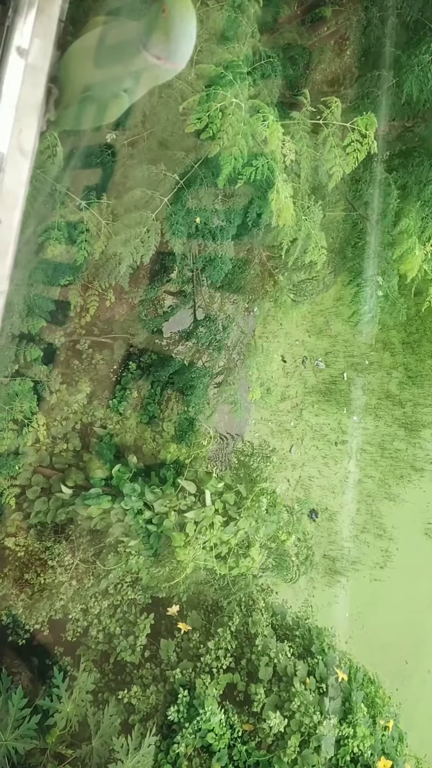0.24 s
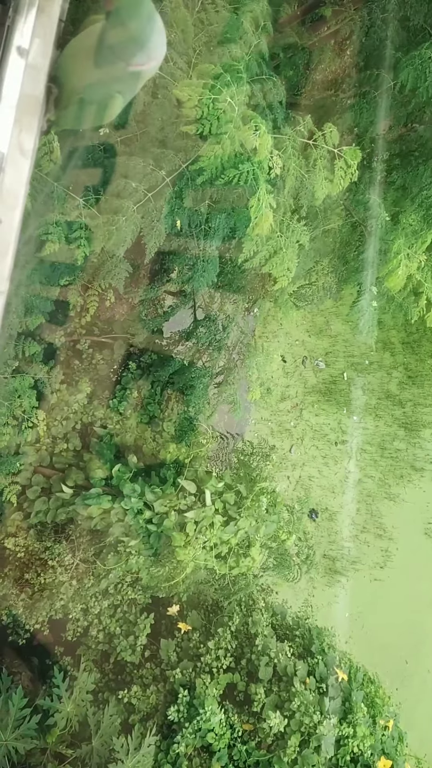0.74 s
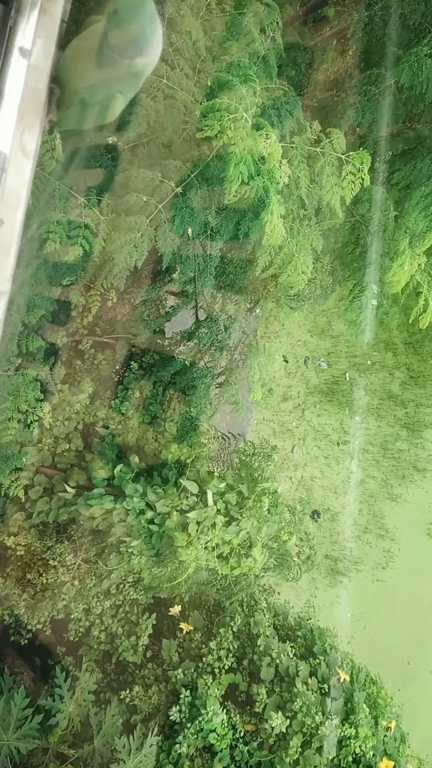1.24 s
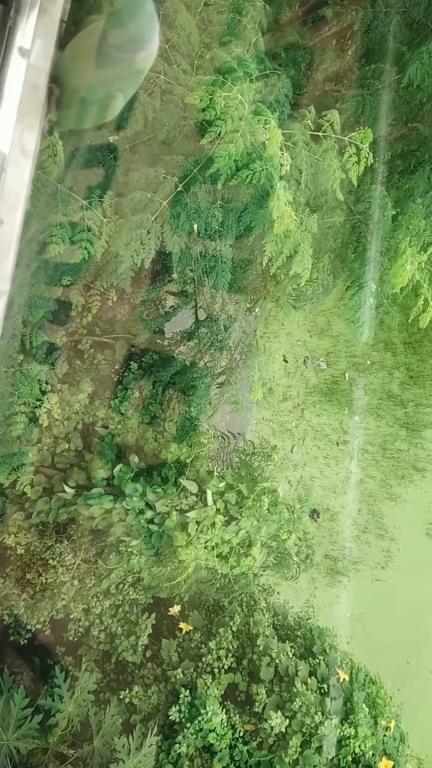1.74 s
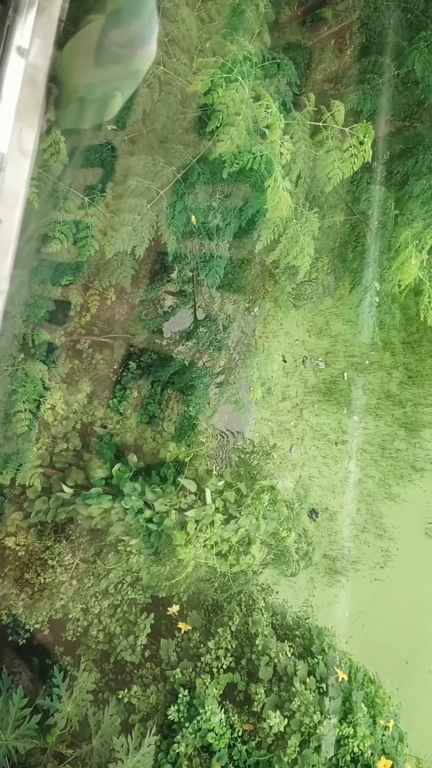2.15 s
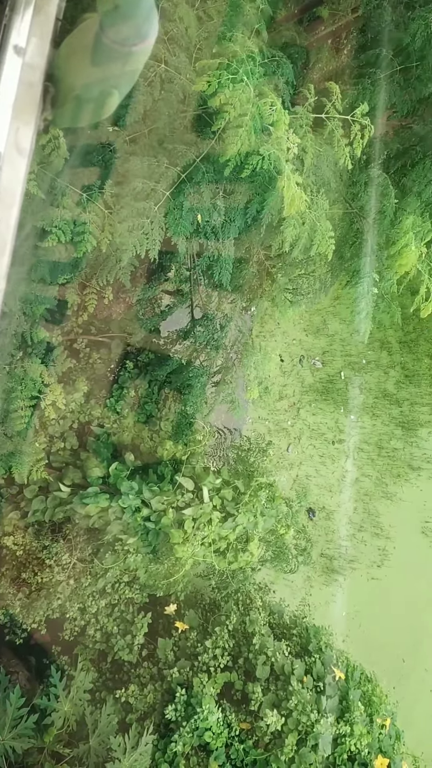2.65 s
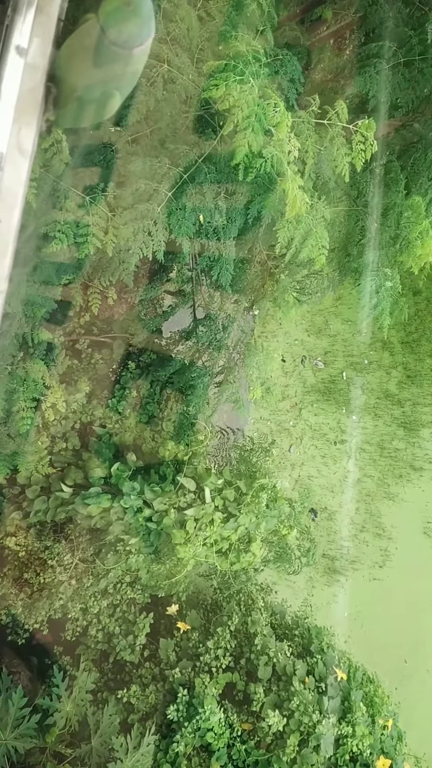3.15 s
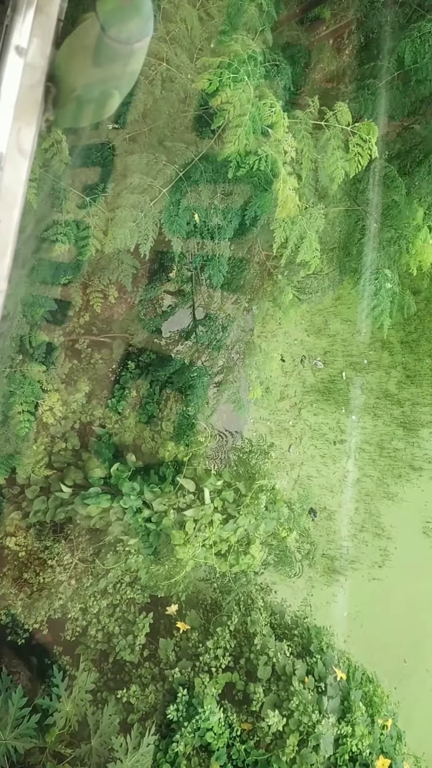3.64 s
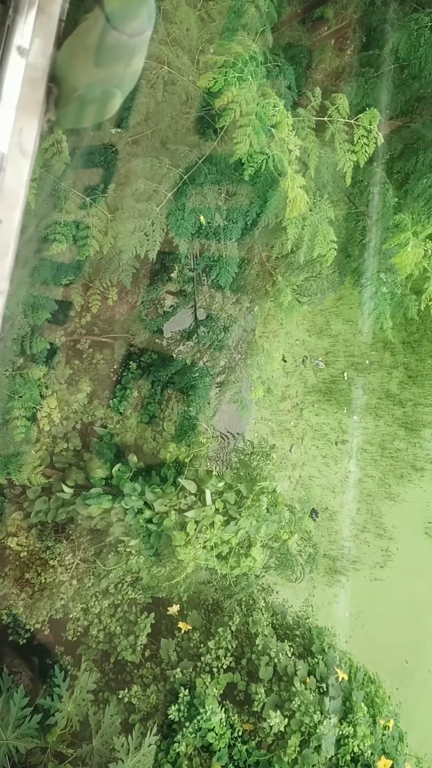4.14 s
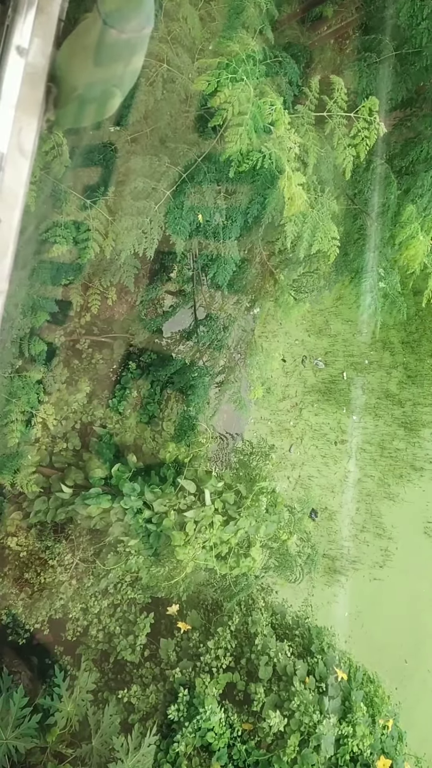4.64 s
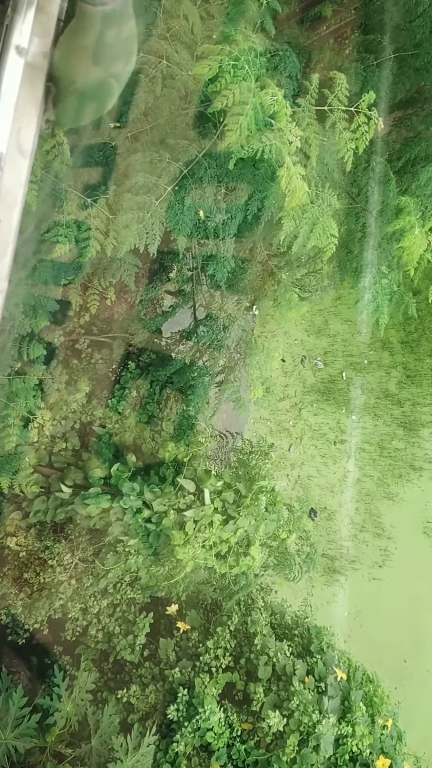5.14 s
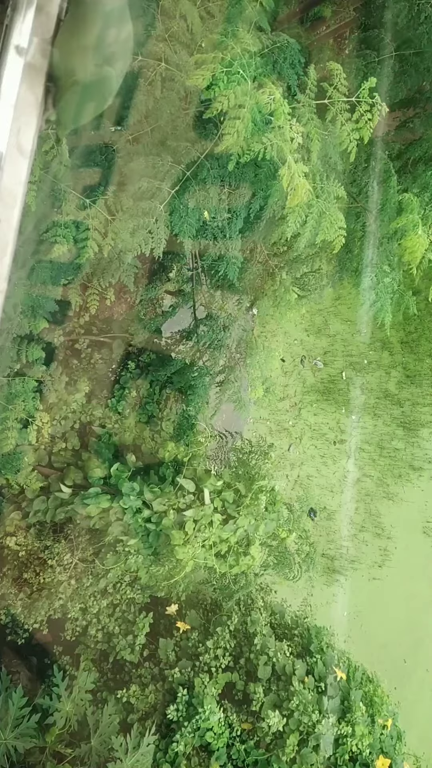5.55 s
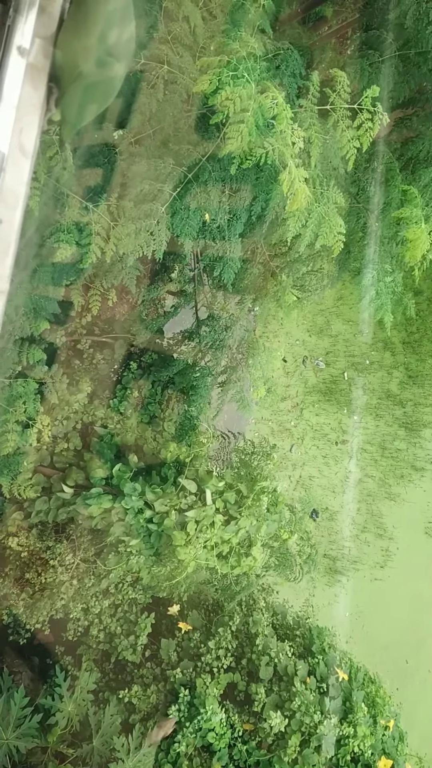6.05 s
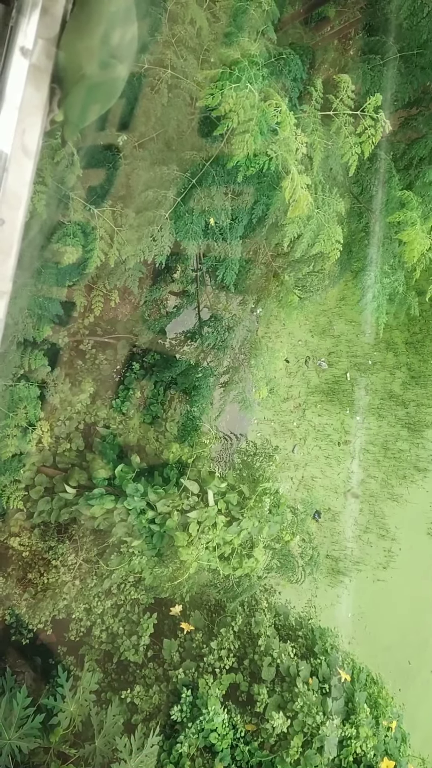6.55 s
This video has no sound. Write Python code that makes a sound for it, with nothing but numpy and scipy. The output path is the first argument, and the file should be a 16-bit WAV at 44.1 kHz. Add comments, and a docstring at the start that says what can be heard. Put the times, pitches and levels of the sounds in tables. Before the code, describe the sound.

Quiet garden air with steady faint hiss, heard from a window in stereo. Two piercing, rough parakeet calls burst out early, very near, slapping off the glass and frame and trailing into leafy echoes. Then mostly calm, with barely audible far bird notes, until two weak, scratchy replies come from the trees. After a long pause with a faint drone and dull taps, four soft muttered clucks end it.

```python
"""Parakeets over a garden

A parakeet at a window gives two shrill screeches, later four short soft clucks: harmonic sums on gliding pitch.
A second one answers twice from the trees, with the same voice model, rougher and fainter.
Short reflections and a decaying noise tail throw the calls back. Behind them: filtered-noise murmur
and thin hiss, a brief distant rumble and drone from resonances, faint taps and far bird notes."""
import sys
import numpy as np
from scipy import signal
from scipy.fft import rfft, irfft
from scipy.io import wavfile
from scipy.ndimage import uniform_filter1d

SR = 44100
rng = np.random.default_rng(int(sys.argv[2]) if len(sys.argv) > 2 else 0)


def materialize(psi):
    """Save the field psi as 16-bit PCM at rate SR to the path in sys.argv[1].

    A 1-D psi becomes a single channel; in a 2-D psi each row is a channel.
    """
    bounded = np.clip(np.atleast_2d(psi).T, -1, 1)
    quanta = np.round(bounded * 32767).astype(np.int16)
    wavfile.write(sys.argv[1], SR, quanta)


N = 299880
EDGE_HZ = 15600  # top of the harmonics and of the recorder's band


# Near calls, nominal arch: (start [s], crest [s], end [s], first pitch [Hz], crest pitch [Hz], last pitch [Hz],
# bow [0-1], steady sag [0-1], final drop lateness [power], warble [Hz], warble depth [0-1],
# warble phase at crest [turns], overtones [dB])
SCREECH_CALLS = [(0.468, 0.513, 0.656, 487.2, 2072, 781.5, 0.04, .49, 7.5, 42.43, .065, .11, -14),
                 (0.968, 1.001, 1.135, 418.6, 1746, 633, .08, .225, 9.8, 41.8, .115, .6, -21.5)]
# Loudness before mixing, one list a call: (time [s], level [dB])
SCREECH_LEVELS = [
    [(0.467, -45.5), (0.472, -18), (0.494, -10.5), (0.512, -13), (0.538, -10.5), (0.565, -9.5),
     (0.612, -8.5), (0.638, -14), (0.656, -27.5)],
    [(0.968, -45), (0.973, -27), (0.979, -31.5), (0.991, -13), (1.014, -9), (1.04, -15), (1.082, -10.5),
     (1.107, -17.5), (1.135, -28)],
]
# Throat colour, beak open: (frequency [Hz], level [dB])
OPEN_BEAK = [(60, -41), (250, -27.5), (480, -1.5), (900, 1.5), (1350, -3.5), (1900, 4.5), (2600, 7),
             (3550, 4), (4300, -3.5), (5000, -5), (7400, -5), (11200, -23), (12400, -33), (15000, -34.5)]
# Left minus right: (frequency [Hz], level [dB])
SCREECH_SIDE = [(400, 4.5), (700, -3.5), (1300, 18), (1700, -1.5), (2250, 18.5), (2800, -7), (3150, 8),
                (3450, -11), (4200, -4), (5000, 1), (8000, -4), (15000, -7)]
# Phase lead of the left port: (frequency [Hz], lead [rad])
SCREECH_LEAD = [(600, 0), (1000, -0.9), (1450, -2.5), (1780, -4.5), (2100, -8.5), (2350, -7.5),
                (2700, -7.5), (3100, -9.5), (3450, -6), (4300, -7), (6200, -9.5), (7400, -13.5),
                (15000, -26)]


def near_screeches():
    """Full voice at the window: direct sound with frame reflections, plus garden echo."""
    voice = np.zeros(N)
    for call, levels in zip(SCREECH_CALLS, SCREECH_LEVELS):
        gesture = sweep(call, levels, tremble=0.0067, hoarse=.05)
        start_s, sound = screech(gesture, OPEN_BEAK, jitter=.048, flutter=.42, rasp=.32, overtone_db=8, fray=.42)
        add(voice, start_s, sound)
    voice = coloured(voice, [(30, -20.5), (70, -7.5), (200, -0.5)])  # mic drops deep bass
    direct = window_frame(placed(voice, SCREECH_SIDE, SCREECH_LEAD))
    return gain_of(-1) * direct + gain_of(-16.5) * garden(voice[None], rise_s=.008)


# Breaks into a thin upper register: (from [s], to [s], pitch [share of sweep], added overtones [dB])
BREAKS = [(0.518, 0.553, .78, 7.5), (2.986, 3.023, .75, 8)]
BREAK_EDGE_S, BREAK_GAP_DB, BREAK_ODD_SHARE = .0035, -15, .06
ROUGH_RISE, ROUGH_END, SETTLE_S = .42, 0.19, .005
ODD_LOSS = 0.3  # odd-harmonic share lost by the end of the fall
GAPE_DB, GAPE_AT, GAPE_WIDTH = 7.5, 0.6, 0.19  # overtone peak; place and width as shares of the fall
ROUGH_BRIGHT_DB, FALL_DULL_DB = 5.5, -8
WARBLE_DIP_DB, WARBLE_ROUGH = -3, 0.2


def sweep(call, levels, tremble, hoarse):
    """Pitch shoots up, sags with growing warble and drops; roughness and overtones follow the arch."""
    (start, crest, end, first_hz, top_hz, last_hz, bow, sag, lateness,
     warble_hz, depth, turns, overtone_db) = call
    t = np.arange(start, end, 1 / SR)
    up = np.clip((t - start) / (crest - start), 0, 1)
    down = np.clip((t - crest) / (end - crest), 0, 1)
    warble = np.cos(2 * np.pi * (warble_hz * (t - crest) + turns))
    trough = down * np.maximum(-warble, 0) ** 2  # voice weakens and rasps here

    final_drop = (1 - sag - last_hz / top_hz) * down ** lateness
    arch = 1 + bow * np.sin(np.pi * np.sqrt(down)) - sag * down - final_drop
    hz = first_hz * (top_hz / first_hz) ** up * arch
    hz *= 1 + depth * down * warble + tremble * band_noise(len(t), 90, 120)

    # rough going up, clear at the crest, fraying going down
    rough = hoarse + ROUGH_RISE * step((crest - t) / SETTLE_S - 1)
    rough += ROUGH_END * down ** 2 + WARBLE_ROUGH * trough
    gape = np.exp(-.5 * ((down - GAPE_AT) / GAPE_WIDTH) ** 2)
    bright_db = overtone_db + ROUGH_BRIGHT_DB * rough + FALL_DULL_DB * down + GAPE_DB * gape
    level_db = np.interp(t, *np.transpose(levels)) + WARBLE_DIP_DB * trough
    odd = 1 - ODD_LOSS * down

    for since, until, share, shrill_db in BREAKS:
        broken = step((t - since) / BREAK_EDGE_S) * step((until - t) / BREAK_EDGE_S)
        hz *= 1 + (share - 1) * broken
        odd *= 1 + (BREAK_ODD_SHARE - 1) * broken
        level_db += BREAK_GAP_DB * np.sin(np.pi * broken) ** 2  # each flip chokes the voice
        bright_db += shrill_db * broken
    return t, hz, level_db, rough, odd, bright_db


def screech(gesture, throat, jitter, flutter, rasp, overtone_db, fray):
    """Syrinx: throat-filtered harmonics, roughened by pitch jitter, flutter and breath puffs."""
    t, hz, level_db, rough, odd, bright_db = gesture
    rough, odd = np.clip(rough, 0, 1), np.clip(odd, .04, 1)
    # uneven cycles smear the upper harmonics most
    pitch = hz * (1 + jitter * rough * band_noise(len(t), 0, 660))
    phase = 2 * np.pi * np.cumsum(pitch) / SR

    k = np.arange(1, 25)[:, None]
    weight = gain_of(read(throat, k * hz)) * (k * hz < EDGE_HZ) * np.where(k % 2, odd, 1)
    weight = weight * np.where(k > 2, gain_of(bright_db + overtone_db), 1)
    partials = np.sqrt(2) * weight * np.cos(k * phase + k ** 2) / np.linalg.norm(weight, axis=0)
    # uneven membrane snaps fray the overtones even in clear stretches
    frayed = (1 + fray * band_noise(len(t), 400, 1200)) / np.hypot(1, fray)
    tone = partials[:2].sum(0) + partials[2:].sum(0) * frayed

    # one puff of air a cycle, treble-weighted
    puffs = coloured(rng.standard_normal(len(t)) * (1 + np.cos(phase)), throat)
    puffs = evened(coloured(puffs, [(500, -19.5), (2000, 4.5), (7000, 7.5)]))
    voice = tone * (1 + flutter * rough * band_noise(len(t), 270, 400)) + rasp * rough * puffs
    return t[0], gain_of(level_db) * evened(voice) * signal.windows.tukey(len(t), .03)


# Far calls, columns as SCREECH_CALLS: (start [s], crest [s], end [s], first pitch [Hz], crest pitch [Hz],
# last pitch [Hz], bow [0-1], sag [0-1], drop lateness [power], warble [Hz], warble depth [0-1],
# warble phase at crest [turns], overtones [dB])
ANSWER_CALLS = [(2.963, 2.994, 3.125, 934, 2374, 1817, .01, -.01, 3.9, 11.45, .085, .2, -10.5),
                (3.404, 3.435, 3.55, 932, 2208, 1545, .05, .36, 1.3, 17.3, 0.045, 0.703, -11.5)]
# Loudness before mixing, one list a call: (time [s], level [dB])
ANSWER_LEVELS = [
    [(2.962, -52), (2.976, -38.5), (3.0, -40), (3.02, -44.7), (3.036, -36.5), (3.072, -46.5),
     (3.095, -34.5), (3.108, -39), (3.125, -43)],
    [(3.402, -55.5), (3.422, -46.5), (3.434, -42), (3.445, -40), (3.458, -51), (3.469, -35.5),
     (3.484, -41.5), (3.515, -42.5), (3.55, -51)],
]
# Throat colour from afar: (frequency [Hz], level [dB])
FAR_BEAK = [(600, -22), (1400, -2.5), (2300, 3), (3000, 1), (3700, 7.5), (4700, -2.5), (5800, 1.5),
            (7300, 0), (11000, -5.5), (14000, -14)]
# Left minus right: (frequency [Hz], level [dB])
ANSWER_SIDE = [(700, -7), (1300, 29), (2400, 6), (4400, -2.5), (15000, 1)]
# Phase lead of the left port: (frequency [Hz], lead [rad])
ANSWER_LEAD = [(300, .7), (1000, 3.135), (1900, 6.2), (2800, 8.6), (4400, 12.6), (6500, 16.4),
               (10000, 26.4), (15000, 34.176)]


def answers():
    """Second bird in the trees; leaves scatter much of its voice."""
    voice = np.zeros(N)
    for call, levels in zip(ANSWER_CALLS, ANSWER_LEVELS):
        gesture = sweep(call, levels, tremble=.015, hoarse=0.15)
        start_s, sound = screech(gesture, FAR_BEAK, jitter=.08, flutter=0.98, rasp=1.0, overtone_db=1.0, fray=.7)
        add(voice, start_s, sound)
    direct = window_frame(placed(voice, ANSWER_SIDE, ANSWER_LEAD))
    return gain_of(-1.0) * direct + gain_of(-10) * garden(direct, rise_s=0.0021)


# Clucks before mixing: (start [s], length [s], first pitch [Hz], last pitch [Hz], level [dB],
# beak parting [share of length], treble once parted [dB])
CLUCKS = [(6.333, 0.043, 661, 260.7, -27, .25, 4), (6.542, .06, 668, 253.1, -25, .52, 8),
          (6.734, 0.018, 686, 933, -42.5, .5, -12), (6.788, 0.029, 771, 329, -21.5, .5, 3)]
# Left minus right: (frequency [Hz], level [dB])
CLUCK_SIDE = [(400, -4), (700, 2.5), (1200, 13.5), (1900, 19.5), (3000, -3), (8000, 7)]
# Phase lead of the left port: (frequency [Hz], lead [rad])
CLUCK_LEAD = [(300, -2), (700, -0.6), (1000, -0.4), (1150, -2), (1800, -0.5), (2100, -3.5), (3200, -9),
              (6000, -7)]


def clucks():
    """Soft muttering at the window, direct plus garden echo."""
    voice = np.zeros(N)
    for row in CLUCKS:
        add(voice, *cluck(mutter(*row), jitter=0.02, hiss=0.61, soften=0.76))
    direct = window_frame(placed(voice, CLUCK_SIDE, CLUCK_LEAD))
    direct = direct * (np.arange(N) > SR)  # direct path silent for the first second
    return gain_of(-1.7) * direct + gain_of(-17) * garden(voice[None], rise_s=0.00324)


CLUCK_ATTACK_S, CLUCK_RELEASE_S, CLUCK_EDGE_DB = 0.01145, 0.0058, -16.5
BEAK_SHUT_DB, BEAK_PARTING = -11, 0.083  # treble gain, beak shut; parting time as share of a cluck


def mutter(start, length, first_hz, last_hz, db, parts_at, parted_db):
    """Straight pitch glide under attack, hold and release; the treble gain shifts as the beak parts."""
    t = np.arange(0, length, 1 / SR)
    edges = np.maximum(1 - t / CLUCK_ATTACK_S, 0) + np.maximum(1 - (length - t) / CLUCK_RELEASE_S, 0)
    parted = step((t / length - parts_at) / BEAK_PARTING)
    open_db = BEAK_SHUT_DB + (parted_db - BEAK_SHUT_DB) * parted
    hz = first_hz + (last_hz - first_hz) * t / length
    return start + t, hz, db + CLUCK_EDGE_DB * edges, open_db


# Throat colour, beak shut: (frequency [Hz], level [dB])
SHUT_BEAK = [(150, -22.5), (300, -6.5), (560, 4.5), (850, 2), (1200, 7.5), (1750, 8), (2050, -5),
             (2350, -19), (3200, -13), (4000, -32), (4800, -23.5), (6000, -58), (12000, -59)]


def cluck(gesture, jitter, hiss, soften):
    """Gliding harmonics through the shut-beak throat, with a rough treble set by the beak."""
    t, hz, level_db, open_db = gesture
    phase = 2 * np.pi * np.cumsum(hz * (1 + jitter * band_noise(len(t), 0, 690))) / SR
    k = np.arange(1, 21)[:, None]
    dull_db = soften * np.minimum(level_db + 25.5, 0) * np.log2(k)  # softer is closer to a sine
    partials = gain_of(read(SHUT_BEAK, k * hz) + dull_db) * np.cos(k * phase + k ** 2 / 2) * np.sqrt(hz)
    high = np.clip((k * hz - 2000) / 400, 0, 1)
    treble = gain_of(open_db) * (1 + hiss * band_noise(len(t), 196.2, 700)) / np.hypot(1, hiss)
    voice = (partials * (1 - high + high * treble)).sum(0)
    return t[0], gain_of(level_db) * evened(voice) * signal.windows.tukey(len(t), .06)


def placed(x, side, lead):
    """Two microphone ports: level and phase differ by frequency, total power kept."""
    hz = bins(x)
    tilt = gain_of(read(side, hz))
    ports = np.array([tilt * np.exp(1j * read(lead, hz)), np.ones(len(hz))])
    return irfft(rfft(x) * ports * np.sqrt(2 / (1 + tilt ** 2)), N)


# Glass and frame reflections: (left delay [ms], left gain [x], right delay [ms], right gain [x])
FRAME = [(.73, -.22, 0.27, -.18), (2.2, 0.0031, 1.33, -0.085), (4.48, 0.2, 5.5, 0.24), (8.64, 0.28, 16, .1),
         (14.7, -.08, 12, .09), (23, 0.041, 10, -.07)]


def window_frame(x):
    """Comb of short reflections off glass and frame, separate for each port."""
    turn_per_ms = -2j * np.pi * bins(x) / 1000
    comb = 1
    for left_ms, left_gain, right_ms, right_gain in FRAME:
        left = left_gain * np.exp(turn_per_ms * left_ms)
        right = right_gain * np.exp(turn_per_ms * right_ms)
        comb = comb + np.array([left, right])
    return irfft(rfft(x) * comb, N)


# House walls across the garden: (delay [s], spread [s], boost over other echoes [dB])
WALLS = [(0.03, .006, 11), (.077, 0.015, 7)]
# Echo decay: (frequency [Hz], t60 [s])
GARDEN_T60 = [(300, 0.5), (1500, 1.18), (3200, 0.58), (5000, 0.81), (10000, 0.46)]
# Echo colour: (frequency [Hz], level [dB])
GARDEN_COLOUR = [(300, 7.5), (1100, -3), (1800, -3.5), (2850, 4.5), (3600, 3.5), (4200, 3), (4800, 7),
                 (6500, -6.5), (7700, 1), (11000, -2)]


def garden(x, rise_s):
    """Scattered echoes from walls and leaves: sparse random taps, decay set by frequency."""
    taps_per_s = 2500
    impulses = rng.standard_normal((2, SR)) * (rng.random((2, SR)) < taps_per_s / SR)
    hz, t, z = signal.stft(impulses, SR, nperseg=256)
    walls_db = sum(db * np.exp(-.5 * ((t - s) / spread) ** 2) for s, spread, db in WALLS)
    fade = gain_of(walls_db - 60 * t / read(GARDEN_T60, hz)[:, None]) * (1 - np.exp(-t / rise_s))
    tail = signal.istft(z * fade, SR, nperseg=256)[1]
    tail /= np.linalg.norm(tail, axis=1, keepdims=True)
    tail = coloured(tail, GARDEN_COLOUR)[:, :SR * 9 // 10]
    return signal.fftconvolve(x, tail, axes=1)[:, :N]


# Far bird notes: (start [s], length [s], pitch [Hz], level [dB])
FAR_NOTES = [(0.06, 0.15, 892, -56), (2.327, 0.11, 980, -62), (2.517, 0.12, 1760, -58),
             (2.63, 0.093, 3120, -60)]


def far_notes():
    """Far birds: each note a blurred whistle of narrow-band noise."""
    out = np.zeros((2, N))
    for s, length, hz, db in FAR_NOTES:
        size = round(length * SR)
        for channel in out:
            add(channel, s, gain_of(db) * band_noise(size, hz, 41) * signal.windows.tukey(size, .7))
    return out


# Faint taps: (time [s], level [dB], centre [Hz], t60 [s])
TAPS = [(4.2, -53.5, 2076, 0.19), (5.608, -48.5, 690, 0.29), (6.17, -55, 900, 0.17)]


def taps():
    """Small dull knocks: decaying band noise, centred."""
    out, t = np.zeros(N), np.arange(SR // 4) / SR
    for s, db, hz, t60 in TAPS:
        add(out, s, gain_of(db - 60 * t / t60) * band_noise(len(t), hz, 1.14 * hz))
    return out


# Distant rumble, level per noise layer: (time [s], level [dB])
RUMBLE = [(1.34, -59), (1.346, -55.5), (1.474, -45.5), (1.488, -39.5), (1.708, -45.5), (1.738, -49),
          (2.0, -58)]
# Its resonances: (centre [Hz], width [Hz], relative level [dB])
RUMBLE_MODES = [(177.5, 13, -6.5), (222, 13, -9), (283, 24, -9), (384, 63, -7), (547, 26, -8.5),
                (716, 550, -17)]
# Faint far drone, level per noise layer: (time [s], level [dB])
DRONE = [(3.9, -74), (4.15, -56.5), (4.35, -61), (4.55, -64), (4.85, -71)]
# Its resonances: (centre [Hz], width [Hz], relative level [dB])
DRONE_MODES = [(754, 42, 11), (588, 110, 6), (1120, 310, 0)]


def far_sound(curve, modes, spread):
    """Resonant noise that swells and fades: a shared layer plus one layer per channel."""
    t, level_db = controls(curve)
    out = np.zeros((3, N))
    for channel in out:
        body = sum(gain_of(db) * band_noise(len(t), hz, width) for hz, width, db in modes)
        add(channel, t[0], gain_of(level_db) * evened(body) * signal.windows.tukey(len(t), .15))
    return out[0] + spread * out[1:]


# Background spectrum, relative: (frequency [Hz], density [dB per Hz])
AIR = [(15, -74.5), (25, -43), (113, -25.5), (164, -7.5), (274, -1.5), (313, -14.5), (378, 0), (421, -9),
       (582, -7), (684, -14.5), (762, -12.5), (1410, -20.5), (1710, -16.5), (1950, -18.5), (15500, -23)]
# Narrow humps on it: (centre [Hz], width [Hz], boost [dB])
AIR_HUMPS = [(208.5, 11, 5.5), (278, 16, 5), (293.05, 21, -1), (380, 26, -0.5), (2960, 120, 1.5),
             (7600, 390, 5.5), (10700, 450, 6), (12100, 650, -0.5), (12500, 510, 5.5)]
# Likeness of the channels: (frequency [Hz], correlation [-1 to 1])
AIR_SAME = [(60, 0.918), (130, 0.75), (290, 1), (640, 0.33), (1410, 0.21), (3100, -0.065), (6820, -0.2),
            (15000, 1)]
# Left minus right: (frequency [Hz], level [dB])
AIR_SIDE = [(60, -12.5), (110, 5), (200, 0), (380, 1.5), (700, 0.5), (1290, 6.5), (2380, 3.5), (4400, -0.5),
            (8120, -2.5), (15000, -12)]


def air(patchy_db, level_db):
    """Shaped noise: low outdoor murmur with drifting patches under an even hiss."""
    frames, hz = N // 512 + 5, np.fft.rfftfreq(2048, 1 / SR)
    a, b, c, d, patches = rng.standard_normal((frames, len(hz), 5)).T
    patches = uniform_filter1d(patches, size=6, axis=0)
    patches = evened(uniform_filter1d(patches, size=12, axis=1))
    same = np.clip(read(AIR_SAME, hz), -1, 1)[:, None]
    left = a + 1j * b
    right = same * left + np.sqrt(1 - same ** 2) * (c + 1j * d)
    humps_db = sum(db * np.exp(-.5 * ((hz - f) / width) ** 2) for f, width, db in AIR_HUMPS)
    side_db = np.array([.5, -.5])[:, None] * read(AIR_SIDE, hz)
    steady_db = (read(AIR, hz) + humps_db + side_db)[:, :, None]
    drift_db = patchy_db * patches / (1 + hz[:, None] / 4000)  # weaker in the treble
    z = np.array([left, right]) * gain_of(steady_db + drift_db)
    sound = signal.istft(z, nperseg=2048, noverlap=1536)[1][:, :N]
    return gain_of(level_db) * sound / sound.mean(0).std()


def gain_of(db):
    """Decibels to amplitude."""
    return 10 ** (np.asarray(db) / 20)


def evened(x):
    """Scales to rms 1."""
    return x / np.sqrt(np.mean(x ** 2) + 1e-20)


def step(x):
    """Smooth step from 0 to 1 around x = 0."""
    return .5 + .5 * np.tanh(x)


def read(points, hz):
    """Reads a curve on a log-frequency axis."""
    f, value = np.transpose(points)
    return np.interp(np.log(hz + 1), np.log(f + 1), value)


def add(mix, s, sound):
    """Mixes a sound in at time s."""
    part = mix[round(s * SR):][:len(sound)]
    part += sound[:len(part)]


def bins(x):
    """Spectrum frequencies of x, Hz."""
    return np.fft.rfftfreq(x.shape[-1], 1 / SR)


def coloured(x, points):
    """Filters x by a (frequency [Hz], level [dB]) curve."""
    return irfft(rfft(x) * gain_of(read(points, bins(x))), x.shape[-1])


def band_noise(size, hz, width_hz):
    """Noise in one resonance, rms 1."""
    x = rng.standard_normal(size)
    return evened(irfft(rfft(x) / (1 + (2 * (bins(x) - hz) / width_hz) ** 2), size))


def controls(rows):
    """Time axis and table columns at every sample."""
    s, *columns = np.transpose(rows)
    t = np.arange(s[0], s[-1], 1 / SR)
    return [t] + [np.interp(t, s, c) for c in columns]


def scene():
    """Birds over the garden background."""
    birds = near_screeches() + answers() + clucks()
    distant = far_sound(RUMBLE, RUMBLE_MODES, spread=0.33) + far_sound(DRONE, DRONE_MODES, spread=0.75)
    small = distant + taps() + far_notes()
    small = coloured(small, [(60, -30), (110, -3), (160, -1.5)])  # mic drops deep bass
    return birds + small + air(patchy_db=.8, level_db=-52.65)


def record(dry):
    """Recorder: soft limit on the loudest peaks, then a low-pass band limit."""
    limited = dry / (1 + (abs(dry) / .85) ** 8) ** (1 / 8)
    low_pass = signal.firwin(511, EDGE_HZ, window=("kaiser", 9), fs=SR)
    return signal.oaconvolve(limited, low_pass[None], "same")


dry = scene()
out = record(dry)
materialize(out)
```